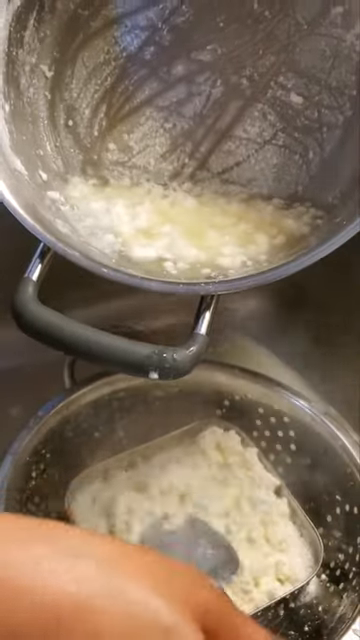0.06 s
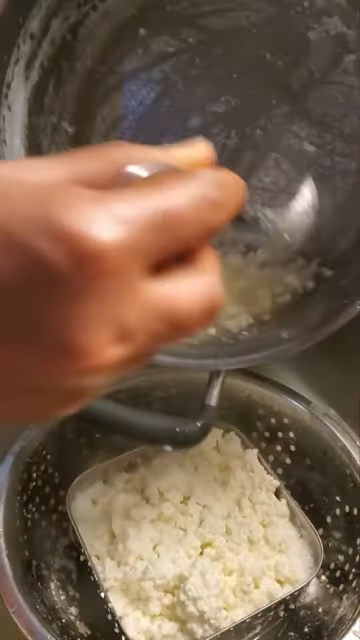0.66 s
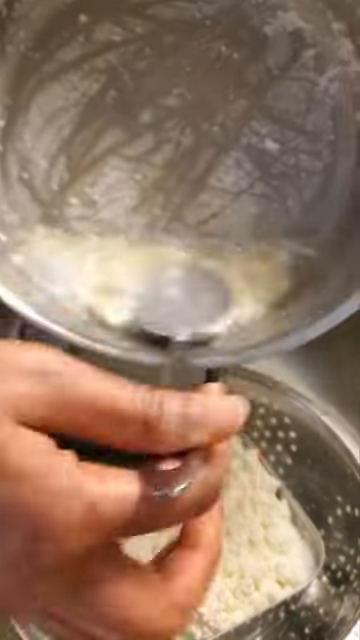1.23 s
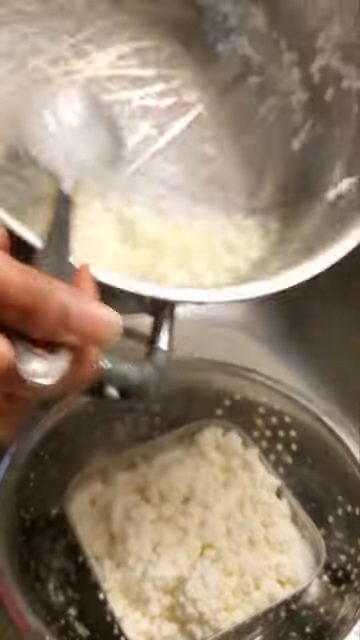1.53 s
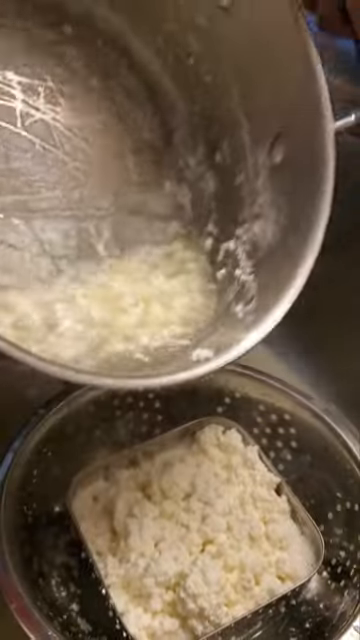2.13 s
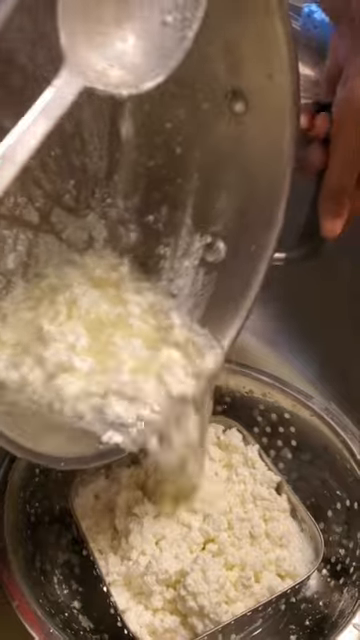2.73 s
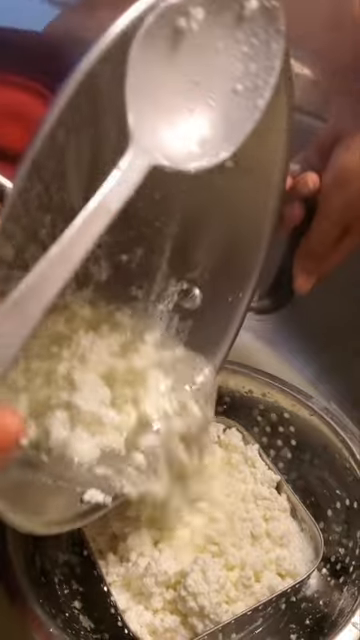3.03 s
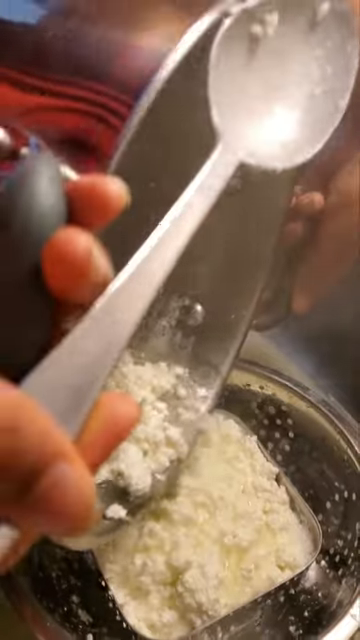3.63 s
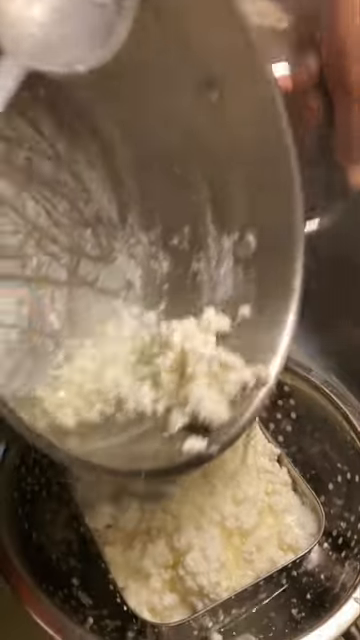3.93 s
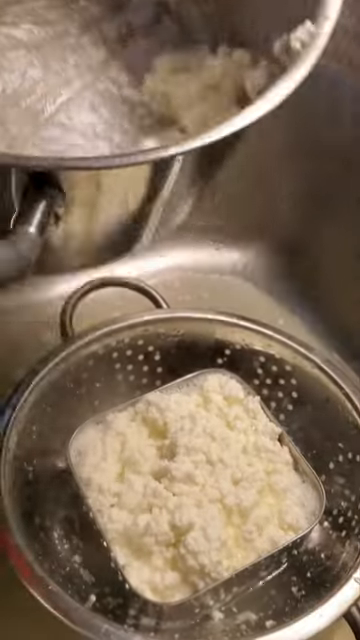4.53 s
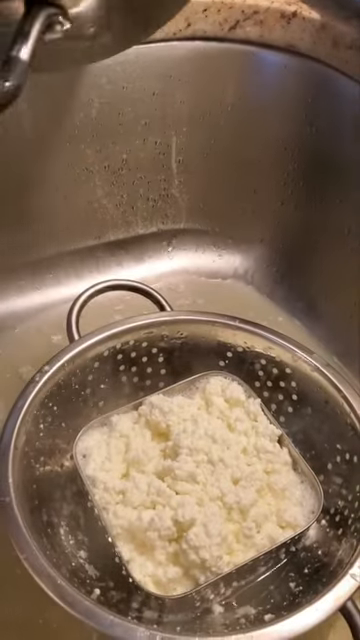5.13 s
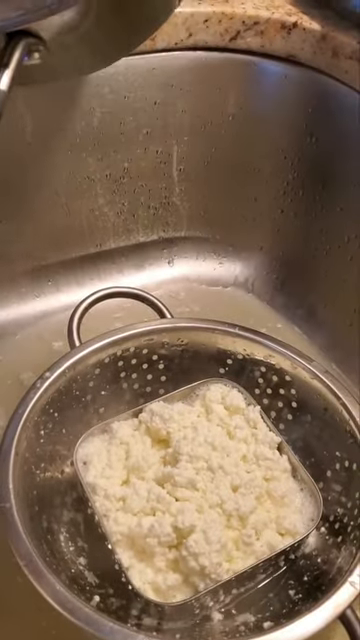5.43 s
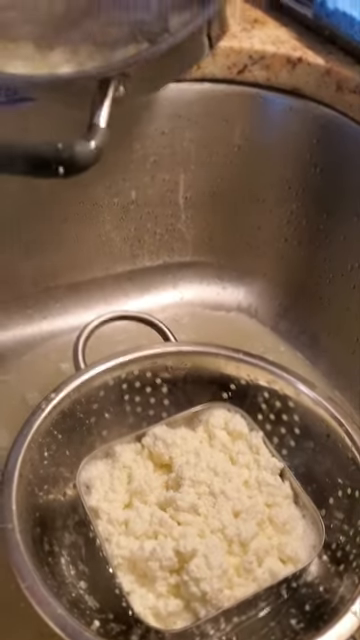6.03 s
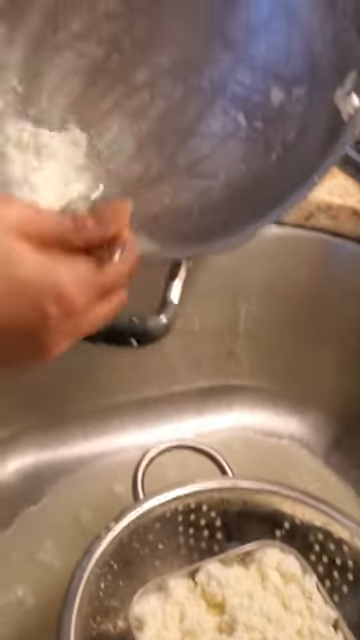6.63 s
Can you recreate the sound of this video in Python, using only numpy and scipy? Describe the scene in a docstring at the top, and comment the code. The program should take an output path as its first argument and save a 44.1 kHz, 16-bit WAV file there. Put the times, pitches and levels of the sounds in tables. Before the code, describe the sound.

A metal spoon clinks and scrapes in a steel pot, and wet curds splat softly as the pot bumps a sink.

```python
"""A steel pot grinds along the edge of a kitchen sink, then a metal spoon clinks and scrapes inside it.
Each hit sets the pot's beating modes ringing; each stroke is a rush of tiny slips with a gritty squeal.
Curds and whey gush and splat into a mould in a colander, and the pot bumps the sink, which booms.
The camera close above adds two soft shudders and a few dry taps. The small kitchen hums behind."""
import sys
import numpy as np
from scipy import signal
from scipy.fft import rfft, irfft, next_fast_len
from scipy.io import wavfile
from scipy.ndimage import map_coordinates

SR = 44100
rng = np.random.default_rng(int(sys.argv[2]) if len(sys.argv) > 2 else 0)


def output_pcm(signal):
    """Save a mono or channel-first signal as 16-bit PCM at the path in sys.argv[1].

    Samples are clipped to [-1, 1] before scaling.
    """
    pcm = np.clip(np.atleast_2d(signal).T, -1, 1) * 32767
    wavfile.write(sys.argv[1], SR, np.round(pcm).astype(np.int16))


N = 298116
TIME = np.arange(N) / SR

# spoon hits, plus the pot's hollow ring as the long scrape ends (6.008 s): (time [s], level [dB],
# hollowness [dB], sizzle [dB], ring [dB], favours the mode nearest [Hz], that mode's level [dB])
CLINKS_AND_RING = [(1.009, -22, 4, -15.5, -64, 660, -9), (1.05, -15, -3.5, -12, -7.5, 760, -15.5),
                   (1.351, -20, 7.5, -15, -19, 660, -6), (1.445, -17, -14, -7.5, -49, 340, -14),
                   (1.596, -29.5, 7, -31, -12.5, 660, -13), (1.614, -24.5, -37, -7, -17, 4100, -24),
                   (1.779, -29.5, -11, -8.5, -10, 2600, -10), (2.122, -28.5, -5.5, -5, -14.5, 3050, -10),
                   (2.321, -41.5, -9, -12, -12, 3500, -31), (2.764, -23, -7.5, -14, -10, 4100, -3),
                   (3.914, -22, -6.5, -3.5, -47, 1600, -13.5), (4.562, -14, -12.5, -7, -7.5, 3050, 1.5),
                   (4.838, -16.5, -12.5, -6.5, -7, 4055, -8), (4.931, -19.5, -9, -5, -5, 2500, -17),
                   (4.957, -19, -24, -15, -2.5, 2580, -11), (4.974, -25.5, -25, -33, -9, 1600, 23),
                   (5.02, -28.5, -4.5, -10, -33, 2530, -11.5), (5.325, -35.5, -23, -10, -29, 760, -4.5),
                   (5.625, -29, -5, -3.5, 3.5, 4100, -8), (5.675, -14.5, -13.5, -8, -10.5, 3700, -0.5),
                   (6.008, -32.5, 6.5, -20, -1, 760, -5), (6.314, -30.5, -1.5, -15, 0, 2500, -16),
                   (6.332, -15.5, -9.5, -10.5, -6, 2500, 0)]
# spoon strokes: (start [s], length [s], start level [dB], end level [dB], squeal [dB], sizzle [dB])
SPOON_STROKES = [(1.456, 0.14, -38, -29.5, -23.5, -5.5), (1.488, 0.026, -25, -28, 1, -9),
                 (1.637, 0.077, -53, -38, -18, -11), (2.412, .10, -43, -29, -8.5, -5),
                 (4.015, 0.025, -42, -36.5, -5, -3.5), (4.919, 0.14, -31, -36.5, -22.5, -9.5),
                 (5.06, 0.24, -46, -51, -19, -11), (5.235, 0.11, -48, -35.5, -23, -2.5),
                 (5.625, 0.3, -40.5, -44, -15.5, -3.5), (5.795, 0.15, -35.5, -32, -1, -2),
                 (5.925, 0.1, -26, -30, -11, -3), (6.364, 0.38, -26.5, -46.5, -17, -15)]
SQUEAL_PITCH = [(1.49, 2370), (1.515, 2650), (1.55, 2800), (2.45, 3440), (5.85, 3500), (5.94, 3384)]  # follows the spoon's contact point: (time [s], pitch [Hz])
POT_MODES = [(335.6, -4.5, 0.17), (663, -2.5, 0.15), (754.5, 4.5, 0.17), (1586, 3, 0.28), (2496, 7, 0.13),
             (2607, -2.5, 0.22), (3004, -1, 0.18), (3480, 2, 0.061), (3610, 2, 0.097), (3820, 1, 0.17),
             (4180, -5.5, 0.11), (4256, 5.5, 0.083), (5470, -6.5, .1), (6420, -4, 0.18)]  # the steel pot's partials: (frequency [Hz], level [dB], t60 [s])
POT_DENSE_DECAY = [(3000, 0.44), (14000, 0.11)]  # its crowded upper modes: (frequency [Hz], t60 [s])
STEEL_SPECTRUM = [(100, -28), (330, 4), (520, -10.5), (1150, -1), (1750, 1), (2450, 7), (3100, 7.5),
                  (4150, 8), (4900, 0.5), (5350, 2.5), (5900, -5), (6550, 0.5), (8200, -17), (13000, -17),
                  (15500, -27.5)]  # struck or rubbed steel: (frequency [Hz], level [dB])
HIT_BANDS = [(60, 520), (520, 1000), (1000, 7500), (7500, 15500)]  # thud, hollowness, clang and sizzle: (low edge [Hz], high edge [Hz])
# surges of whey and curds: (crest [s], level [dB], swell [s], t60 [s], spray [dB])
WHEY_GUSHES = [(2.922, -34.5, 0.081, 0.75, -12.5), (3.265, -46, 0.063, 0.51, 0.5),
               (3.62, -53.5, 0.25, 0.49, -3.5), (4.219, -49.5, 0.036, 0.86, -10.5)]
# wet splats, then two short dry taps near the microphone: (time [s], level [dB], centre [Hz], t60 [s])
SPLATS_AND_TAPS = [(2.189, -40, 4200, 0.085), (2.953, -21.5, 4000, 0.039), (3.06, -34, 12000, 0.033),
                   (3.11, -21, 7300, 0.047), (3.208, -36.5, 8900, 0.061), (3.23, -44, 1084, .08),
                   (3.267, -36.5, 5540, 0.028), (3.328, -43, 2500, 0.045), (3.358, -33, 2390, 0.044),
                   (3.408, -36.5, 1080, 0.09), (3.41, -34, 4750, 0.11), (3.463, -39, 10000, 0.022),
                   (3.666, -42, 4950, 0.047), (3.728, -38.5, 4220, 0.07), (3.798, -41, 3280, 0.057),
                   (3.853, -40, 3050, 0.065), (3.991, -26.5, 3130, 0.013), (4.185, -34.5, 1080, 0.012)]
WET_SPECTRUM = [(200, 6.5), (1300, -3), (3600, 4.5), (8300, -6.5), (12500, 5), (16000, -14)]  # wet patter: (frequency [Hz], level [dB])
POT_BUMPS = [(3.915, 4.9, -34.5, 1.5), (5.029, 8.1, -36.5, 8.5), (6.085, 3.2, -17.5, 7),
             (6.648, 5.2, -15, 5.5)]  # pot against sink: (time [s], rise [ms], level [dB], hollowness [dB])
# pot along the sink's edge: (start [s], length [s], start level [dB], end level [dB])
POT_DRAGS = [(0.248, 0.16, -25.5, -45.5), (0.517, 0.087, -33.5, -38), (0.602, 0.065, -43, -31.5)]
SINK_MODES = [(127.2, -8, 0.27), (340, 2, 0.3), (432, 3, 0.15), (650, 2, 0.16), (764, 7, 0.24),
              (1575, -13, 0.1), (2505, -10, 0.09)]  # the bowl with the pot on it: (frequency [Hz], level [dB], t60 [s])
THUD_SPECTRUM = [(40, -38), (120, 3.5), (260, 4), (400, 14), (540, -2), (780, -1.5), (1300, -23),
                 (3900, -21.5), (5500, -36), (15000, -74)]  # the bumped sink: (frequency [Hz], level [dB])
GRIND_SPECTRUM = [(40, -24), (400, 4.5), (600, -17.5), (750, -3), (1100, -51), (3700, -32), (6700, -45),
                  (8000, -62)]  # the dragged pot: (frequency [Hz], level [dB])
HAND_NUDGES = [(0.03, -40), (4.479, -42)]  # the hand shifts on the camera: (time [s], level [dB])
AIR_SPECTRUM = [(15, -44.5), (25, -6), (134, -0.5), (206, -12), (354, -9.5), (2000, -25), (3430, -26),
                (12200, -38), (16000, -45.5)]  # airy side of the hum: (frequency [Hz], level [dB])
DRONE_MODES = [(59, 6.4, -8), (344, 22.6, 1.5), (400.3, 9.9, -2)]  # pitched side of the hum: (frequency [Hz], width [Hz], level [dB])
# background level, dipping after the loud clanks and creeping back up: (time [s], level [dB])
BACKGROUND_FADER = [(0.0, -46.5), (1.0, -53), (1.9, -56.5), (3.0, -50.5), (4.3, -49.5), (5.5, -60),
                    (6.76, -45.5)]
ROOM_DECAY = [(4000, 0.42), (14000, 0.23)]  # the kitchen's reverb: (frequency [Hz], t60 [s])
STEREO_LIKENESS = [(300, 0.93), (650, 0.5), (1300, 0.089), (3000, 0), (9000, 0.65)]  # stereo image: (frequency [Hz], left-right correlation [0-1])
STEREO_LEAN = [(200, 0), (1500, 0), (3500, 1), (6500, -1), (12000, -4)]  # the microphones' colour: (frequency [Hz], left over right [dB])


def pot_clinks(crash_t60=0.066, modes_db=5.5, dense_db=-6, rise_ms=4, thud_db=-14, db_per_octave=6):
    """A short crash, then the wet pot rings on around one note; hits on its floor sound hollow."""
    out, t = np.zeros((2, N)), np.arange(SR // 2) / SR
    for start, db, hollow_db, sizzle_db, ring_db, near_hz, note_db in CLINKS_AND_RING:
        note_hz, _, note_t60 = min(POT_MODES, key=lambda row: abs(row[0] - near_hz))
        modes = [(hz, mode_db - db_per_octave * abs(np.log2(hz / note_hz)), t60)
                 for hz, mode_db, t60 in POT_MODES]
        steel = rippled(noise(len(t), STEEL_SPECTRUM), depth_db=6, width_hz=130)
        crash = steel * decay(t, crash_t60)
        shimmer = damped(rippled(steel, depth_db=7, width_hz=35), POT_DENSE_DECAY)
        ring = amp(modes_db) * struck(t, modes, scatter_db=6.5) + amp(dense_db) * shimmer
        note = beating_mode(t, note_hz, note_t60)
        clink = crash / onset_rms(crash) + amp(ring_db) * ring + amp(note_db) * note
        add(out, start, amp(db) * shaped_hit(clink, t, rise_ms, [thud_db, hollow_db, 0, sizzle_db]))
    return out


def spoon_scrapes(attack_s=0.022, release_t60=0.082, pot_db=-4.5, jitter=0.013, grit_db=4):
    """Tiny slips of the spoon's edge ring the pot, and a gritty squeal glides as the contact moves."""
    slips = colour(grains(per_s=4700, spread_db=1), STEEL_SPECTRUM)
    slips = unit_rms(band(slips, 1000, SR / 2))
    slips = shifting_ripples(slips, depth_db=7.5, width_hz=170, hold_s=0.03)
    catch = amp(4 * np.tanh(drift(per_s=54)))  # the edge grabs and lets go, within 4 dB
    chatter = amp(0.5 * drift(per_s=150))
    slips = slips * catch * chatter
    squeal_hz = automation(SQUEAL_PITCH) * (1 + jitter * drift(per_s=500))
    phase = 2 * np.pi * np.cumsum(squeal_hz) / SR
    tone = np.sin(phase) + 0.46 * np.sin(1.9 * phase)
    squeal = unit_rms(tone * amp(grit_db * drift(per_s=350)))
    rub, force = np.zeros((2, N)), np.zeros(N)
    for *shape, squeal_db, sizzle_db in SPOON_STROKES:
        pressure = stroke_envelope(*shape, attack_s, release_t60)
        rub += pressure * (body_and_fizz(slips, 0.85, amp(sizzle_db)) + amp(squeal_db) * squeal)
        force += pressure
    return rub + amp(pot_db) * np.std(rub) * rubbed(force * catch, POT_MODES, damping=4.8)


def whey_pour(wash_db=-5, tick_t60=0.027, lumps_db=3, trickle_db=-64, trickle_spray_db=-9):
    """Whey and crumbs of curd land as wet ticks over a soft wash, gushing above a steady trickle."""
    ticks, t = np.zeros((2, N)), np.arange(SR // 32) / SR
    for hz in np.geomspace(700, 13000, num=10):
        burst = rng.standard_normal(len(t)) * decay(t, tick_t60)
        tick = band(burst, hz / np.sqrt(2), hz * np.sqrt(2))
        ticks += signal.oaconvolve(grains(per_s=70, spread_db=4), tick[None], axes=1)[:, :N]
    patter = colour(ticks, WET_SPECTRUM) + amp(wash_db) * noise(N, WET_SPECTRUM)
    flow, spray = amp(trickle_db), amp(trickle_db + trickle_spray_db)  # the colander keeps draining
    for *shape, spray_db in WHEY_GUSHES:
        gush = gush_envelope(*shape)
        flow = flow + gush
        spray = spray + amp(spray_db) * gush
    lumpiness = amp(lumps_db * np.tanh(drift(per_s=77)))
    return body_and_fizz(patter * lumpiness, flow, spray)


def splats_and_taps(slap_db=4, slap_t60=0.00083, width_octaves=0.88, tail_db=-1, plop_below_hz=3000):
    """Lumps slap and spray, low ones with a bubble's rising plop; the two shortest are dry taps."""
    out, t = np.zeros((2, N)), np.arange(SR // 6) / SR
    grid_hz = np.geomspace(60, 16000, num=30)
    for start, db, hz, t60 in SPLATS_AND_TAPS:
        hump_db = np.maximum(-4.3 * (np.log2(grid_hz / hz) / width_octaves) ** 2, -28)
        burst = rippled(noise(len(t), np.c_[grid_hz, hump_db]), depth_db=6, width_hz=400)
        envelope = amp(tail_db) * decay(t, t60) + amp(slap_db) * decay(t, slap_t60)
        plop = 1.1 * (hz < plop_below_hz) * mode(t, hz * (1 + t), t60)
        add(out, start, amp(db) * (plop + burst * envelope))
    return out


def pot_bumps(thud_t60=0.031, modes_db=-2, boom_db=-15, boom_t60=0.29, clang_db=-1.5, sizzle_db=-31):
    """The heavy pot meets the sink: a dull thud, then the bowl's rough boom and ringing modes."""
    out, t = np.zeros((2, N)), np.arange(SR // 2) / SR
    for start, rise_ms, db, hollow_db in POT_BUMPS:
        thud = noise(len(t), THUD_SPECTRUM) * (decay(t, thud_t60) + amp(boom_db) * decay(t, boom_t60))
        bump = thud / onset_rms(thud) + amp(modes_db) * struck(t, SINK_MODES, scatter_db=-0.5)
        add(out, start, amp(db) * shaped_hit(bump, t, rise_ms, [0, hollow_db, clang_db, sizzle_db]))
    return out


def pot_drags(attack_s=0.032, release_t60=0.17, judder_db=2, sink_db=-9, pot_db=-22):
    """The pot judders along the sink's edge and sets the bowl booming; its own wall rings faintly."""
    pressure = sum(stroke_envelope(*row, attack_s, release_t60) for row in POT_DRAGS)
    force = pressure * amp(judder_db * drift(per_s=90))
    grind = force * noise(N, GRIND_SPECTRUM)
    bowl = amp(sink_db) * rubbed(force, SINK_MODES, damping=1.8)
    wall = amp(pot_db) * rubbed(force, POT_MODES, damping=6.9)
    return panned(grind + np.std(grind) * (bowl + wall), left_db=-1)


def camera_tap(start=4.3725, db=-1.5, push_ms=0.45, thump_hz=75, far_db=-10, lag_s=0.00062):
    """A tap on the camera beside the right microphone: one push and pull, a tick and a low thump."""
    out, t = np.zeros((2, N)), np.arange(SR // 8) / SR
    from_centre = t * 1000 / push_ms - 3
    push = -from_centre * np.exp((1 - from_centre ** 2) / 2)
    hiss = noise(len(t), [(900, -18.5), (1600, -11), (3300, -8), (4200, -21), (15000, -31)])[0]
    tick = hiss * (decay(t, t60=0.015) + amp(-5) * decay(t, t60=0.075))
    thump = np.sin(2 * np.pi * thump_hz * t) * decay(t, t60=0.11)
    tap = amp(db) * (push + amp(-19) * tick + amp(-25) * thump)
    add(out[1:], start, tap)
    add(out[:1], start + lag_s, amp(far_db) * tap)  # later and softer on the left
    return out


def hand_nudges(shudder_hz=60, t60=0.28, rise_s=0.004):
    """The camera shudders softly in the hand."""
    out, t = np.zeros((2, N)), np.arange(SR // 4) / SR
    for start, db in HAND_NUDGES:
        add(out, start, amp(db) * np.minimum(t / rise_s, 1) * mode(t, shudder_hz, t60))
    return panned(out, left_db=-3)


def kitchen_reverb(x, wet_db=-15, predelay_s=0.0053):
    """The short tail of a small tiled room; the highs die first."""
    tail = damped(noise(SR // 2, [(6000, -6), (15000, -4.5)]), ROOM_DECAY)
    tail *= np.arange(SR // 2) / SR > predelay_s
    return amp(wet_db) * signal.fftconvolve(x, tail / np.linalg.norm(tail[0]), axes=1)[:, :N]


def kitchen_hum(air_db=-2, drone_db=-1):
    """A steady fan-like drone; its fader is drawn to dip after the loud clanks and creep back up."""
    air = noise(N, AIR_SPECTRUM)
    rumble = noise(N, [(600, -3.5), (3000, -56)])
    drone = sum(amp(db) * unit_rms(resonance(rumble, hz, width)) for hz, width, db in DRONE_MODES)
    bed = amp(air_db) * air + amp(drone_db) * unit_rms(drone)
    return panned(amp(automation(BACKGROUND_FADER)) * bed, left_db=-2)


def mode(t, hz, t60):
    """One dying partial; it reaches the left microphone first."""
    phase_gap = np.arccos(np.clip(at_hz(STEREO_LIKENESS, np.min(hz)), -1, 1))
    phase = 2 * np.pi * rng.random() + np.array([[phase_gap / 2], [-phase_gap / 2]])
    return np.sqrt(2) * np.sin(2 * np.pi * hz * t + phase) * decay(t, t60)


def beating_mode(t, hz, t60, split=0.014, flank_db=-6):
    """The vessel is not quite round, so each mode is a close cluster that beats."""
    flanks = mode(t, hz * (1 - split), t60) + mode(t, hz * (1 + split), t60)
    return mode(t, hz, t60) + amp(flank_db) * flanks


def struck(t, modes, scatter_db):
    """All modes of a body ring; each hit favours them a little differently."""
    ring = sum(amp(db + scatter_db * rng.standard_normal()) * beating_mode(t, hz, t60)
               for hz, db, t60 in modes)
    return ring / onset_rms(ring)


def rubbed(force, modes, damping):
    """Friction keeps a body's modes sounding; the contact widens them."""
    drive = rng.standard_normal((2, N)) * force
    ring = sum(amp(db) * np.sqrt(t60) * resonance(drive, hz, damping / t60) for hz, db, t60 in modes)
    return unit_rms(ring)


def shaped_hit(sound, t, rise_ms, levels_db):
    """Force builds over the contact; where and how hard it lands sets the weight of each band."""
    attack = np.minimum(t * 1000 / rise_ms, 1)
    parts = [band(sound * attack, lo, hi) for lo, hi in HIT_BANDS]
    return sum(amp(db) * part / onset_rms(part) for db, part in zip(levels_db, parts))


def rippled(pair, depth_db, width_hz):
    """Each contact excites its own peaks and dips among crowded resonances."""
    n = pair.shape[1]
    knots = np.clip(rng.standard_normal(1024), -2, 1)
    ripple = np.interp(np.fft.rfftfreq(n, 1 / SR) / width_hz, np.arange(len(knots)), knots)
    return unit_rms(irfft(rfft(pair) * amp(depth_db * ripple), n))


def shifting_ripples(pair, depth_db, width_hz, hold_s):
    """A travelling contact brings out one patch of crowded resonances after another."""
    hz, t, frames = signal.stft(pair, SR, nperseg=512)
    knots = np.clip(rng.standard_normal((256, 512)), -2, 1.5)
    grid = np.meshgrid(hz / width_hz, t / hold_s, indexing="ij")
    ripple = map_coordinates(knots, grid, order=1, mode="wrap")
    return unit_rms(signal.istft(frames * amp(depth_db * ripple), SR, nperseg=512)[1][:, :N])


def stroke_envelope(start, length, first_db, last_db, attack_s, release_t60):
    """Contact builds, the pressure changes steadily, then it lets go."""
    t = TIME - start
    pressure = amp(np.interp(t, [0, length], [first_db, last_db]))
    return np.clip(t / attack_s, 0, 1) * pressure * decay(np.maximum(t - length, 0), release_t60)


def gush_envelope(crest, db, swell_s, t60):
    """The flow swells to a crest, then drains away."""
    t = TIME - crest
    swell = np.exp(-(np.minimum(t, 0) / swell_s) ** 2)
    return amp(db) * swell * decay(np.maximum(t, 0), t60)


def grains(per_s, spread_db):
    """Two trains of random clicks, mostly small, a few large."""
    size = amp(spread_db * np.minimum(rng.exponential(1, (2, N)), 4))
    return unit_rms(size * rng.choice([-1, 1], (2, N)) * (rng.random((2, N)) < per_s / SR))


def drift(per_s):
    """A random wander of rms 1."""
    knots = rng.standard_normal(2048)
    return unit_rms(np.interp(TIME * per_s, np.arange(len(knots)), knots))


def noise(n, spectrum):
    """Stereo noise with a spectrum of (frequency [Hz], level [dB])."""
    return colour(rng.standard_normal((2, n)), spectrum)


def colour(pair, spectrum):
    """Gives two unrelated signals a shared EQ and the scene's stereo width."""
    n = pair.shape[1]
    size = next_fast_len(n)
    hz, (a, b) = np.fft.rfftfreq(size, 1 / SR), rfft(pair, size)
    likeness = np.clip(at_hz(STEREO_LIKENESS, hz), -1, 1)
    mid, side = a * np.sqrt(1 + likeness), b * np.sqrt(1 - likeness)
    stereo = np.array([mid + side, mid - side]) * amp(at_hz(spectrum, hz))
    return unit_rms(irfft(stereo, size)[:, :n])


def damped(x, t60s):
    """Lets each frequency die at its own speed."""
    hz, t, frames = signal.stft(x, SR, nperseg=256)
    fade = decay(t, at_hz(t60s, hz)[:, None])
    return signal.istft(frames * fade, SR, nperseg=256)[1][:, :x.shape[1]]


def body_and_fizz(x, body_gain, fizz_gain):
    """Puts a texture's body and its top end on separate faders."""
    return body_gain * unit_rms(band(x, 150, 7500)) + fizz_gain * unit_rms(band(x, 7500, 16000))


def band(x, lo_hz, hi_hz):
    """Causal band-pass."""
    edges = [lo_hz, min(hi_hz, SR / 2 - 1)]
    return signal.sosfilt(signal.butter(3, edges, "bandpass", fs=SR, output="sos"), x)


def resonance(x, hz, width_hz):
    """One resonant peak of gain 1."""
    return signal.lfilter(*signal.iirpeak(hz, hz / width_hz, SR), x)


def amp(db):
    """Decibels to gain."""
    return 10 ** (np.asarray(db) / 20)


def decay(t, t60):
    """Falls 60 dB every t60 seconds."""
    return amp(-60 * t / t60)


def unit_rms(x):
    """Scales to rms 1."""
    return x / np.sqrt(np.mean(x ** 2) + 1e-20)


def onset_rms(x):
    """Level of a hit's first 25 ms."""
    return np.sqrt(np.mean(x[..., :SR // 40] ** 2) + 1e-20)


def at_hz(points, hz):
    """Reads a table on a log-frequency axis."""
    knots_hz, values = np.transpose(points)
    return np.interp(np.log(hz + 1), np.log(knots_hz + 1), values)


def automation(points):
    """Reads a time curve at every sample."""
    return np.interp(TIME, *np.transpose(points))


def panned(x, left_db):
    """Tips a pair to the left; negative goes right."""
    return x * amp([[left_db / 2], [-left_db / 2]])


def add(mix, start, sound):
    """Mixes a sound in at start seconds."""
    part = mix[:, round(start * SR):][:, :sound.shape[-1]]
    part += sound[..., :part.shape[1]]


def scene():
    """Pot, spoon and curds feed the room's reverb; the loud tap, nudges and hum stay dry."""
    action = pot_clinks() + pot_bumps() + pot_drags() + spoon_scrapes() + whey_pour() + splats_and_taps()
    return action + kitchen_reverb(action) + camera_tap() + hand_nudges() + kitchen_hum()


def record(dry):
    """Each microphone has its own colour; a soft clip rounds the peaks and a low-pass trims the top."""
    size = next_fast_len(N)
    lean_db = at_hz(STEREO_LEAN, np.fft.rfftfreq(size, 1 / SR))
    heard = irfft(rfft(dry, size) * amp([lean_db / 2, -lean_db / 2]), size)[:, :N]
    rounded = heard / (1 + heard ** 6) ** (1 / 6)
    low_pass = signal.firwin(255, cutoff=15500, window=("kaiser", 9), fs=SR)
    return signal.oaconvolve(rounded, low_pass[None], "same")


dry = scene()
out = record(dry)
output_pcm(out)
```